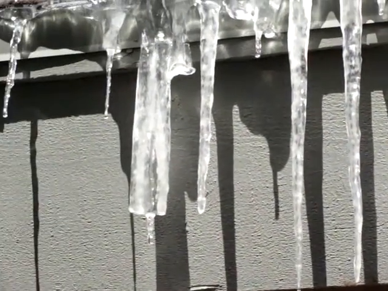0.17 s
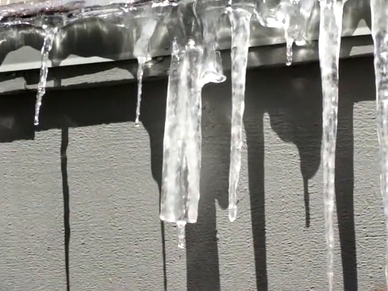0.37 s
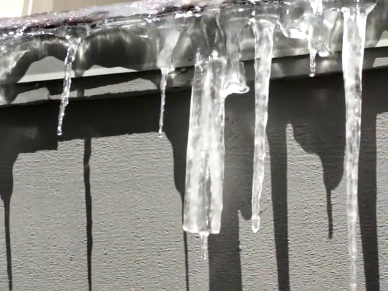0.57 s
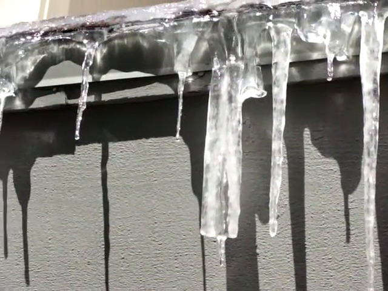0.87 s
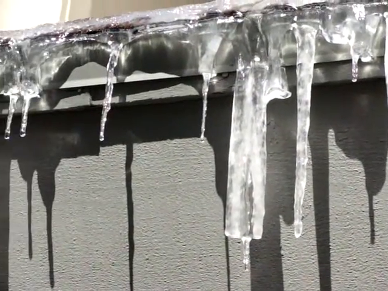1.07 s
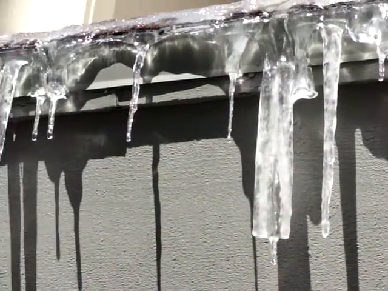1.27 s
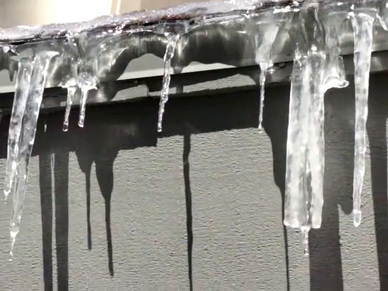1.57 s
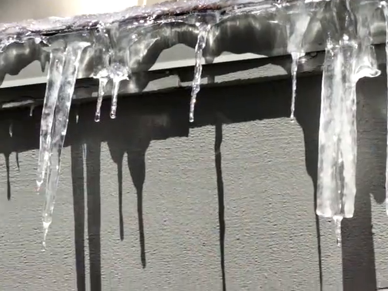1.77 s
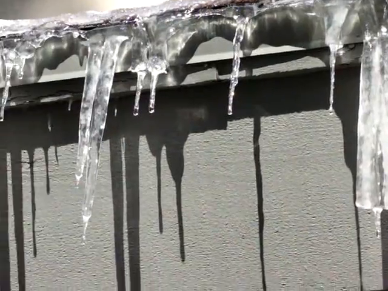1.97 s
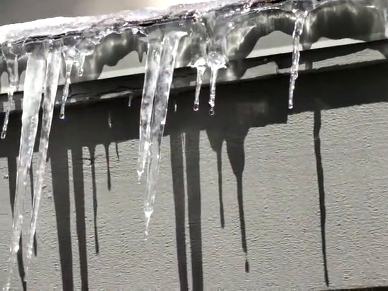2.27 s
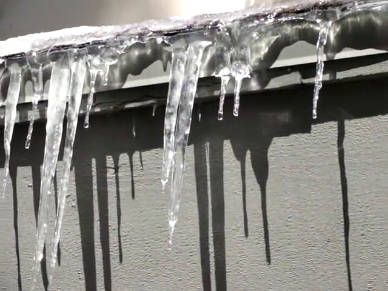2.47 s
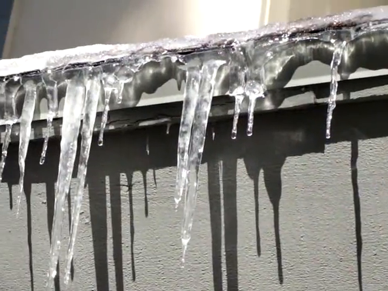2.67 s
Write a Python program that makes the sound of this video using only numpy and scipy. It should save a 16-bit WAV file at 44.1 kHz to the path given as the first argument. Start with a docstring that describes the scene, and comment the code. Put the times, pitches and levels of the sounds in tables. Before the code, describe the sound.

Distant birds chirp over a quiet steady outdoor hum; soft low bumps come in the first second, then irregular icicle drips click and plop nearby, the sharpest just after one second.

```python
"""A steady outdoor hum with small birds chirping and chattering in the distance, from the start;
then low thumps, some perhaps from handling the microphone, and meltwater drips from icicles under an eave
that tick and splash near it. The hum is shaped noise with wavering tones, the birds are gliding sines blurred
by echoes, the thumps are brief low swings, and each drip is a filtered click with a ringing plop and a fading
noise spatter."""
import sys
import numpy as np
from scipy import signal
from scipy.io import wavfile
from scipy.ndimage import uniform_filter1d

SR = 44100
rng = np.random.default_rng(int(sys.argv[2]) if len(sys.argv) > 2 else 0)


def log_audio(samples):
    """Write samples as a 16-bit WAV file to the path given in sys.argv[1]."""
    # one column per channel
    frames = np.atleast_2d(samples).T
    # limit to full scale, then quantise
    limited = np.clip(frames, -1, 1)
    pcm = np.round(limited * 32767).astype(np.int16)
    wavfile.write(sys.argv[1], SR, pcm)


def volts_from_db(level):
    """Convert decibel levels to linear amplitude ratios."""
    exponent = np.asarray(level, float) / 20
    return 10 ** exponent


N = 123921


def evened(x):
    """Scales to rms 1."""
    return x / np.sqrt(np.mean(x ** 2) + 1e-20)


def add(mix, start_s, sound):
    """Adds a sound at a time, or at the beginning if that time is negative."""
    part = mix[max(round(start_s * SR), 0):][:len(sound)]
    part += sound[:len(part)]


def wobble(size, smooth_samples):
    """Low-passed noise of rms 1."""
    pole = np.exp(-1 / smooth_samples)
    return evened(signal.lfilter([1], [1, -pole], rng.standard_normal(size)))


def air():
    """Distant steady wash: shaped noise in faint drifting patches, with a few wavering tones."""
    # Each row: frequency in Hz, relative noise density in dB.
    air_spectrum = [(12, -33), (20, -4.5), (49, -4), (165, -3.5), (294, -1.5), (434, -3), (677, 0.5),
                    (1000, 0), (1300, -5.5), (1560, -3), (1780, -10.5), (1970, -7.5), (2370, -13),
                    (4790, -9.5), (6550, -18.5), (8070, -19), (10200, -24.5), (13300, -54), (22000, -120)]
    # Each row: mean frequency in Hz, rms level in dB before the wavering.
    hum_tones = [(47, -63.5), (120, -70), (7875, -77.5)]
    wash_rms_db, patch_db = -48.5, 1.1
    frames, bin_hz = N // 256 + 5, np.arange(513) * SR / 1024
    real, imag, patches = rng.standard_normal((frames, 513, 3)).T
    patches = uniform_filter1d(patches, size=10, axis=0)  # bins
    patches = evened(uniform_filter1d(patches, size=12, axis=1))  # frames
    hz, db = np.transpose(air_spectrum)
    shape_db = np.interp(np.log(bin_hz + 1), np.log(hz + 1), db)[:, None]
    spectrum = (real + 1j * imag) * volts_from_db(shape_db + patch_db * patches)
    wash = signal.istft(spectrum, nperseg=1024, noverlap=768)[1][:N]
    out = volts_from_db(wash_rms_db) * evened(wash)
    for tone_hz, db in hum_tones:
        turns = np.cumsum(tone_hz + 2.5 * wobble(N, 3000)) / SR
        level = np.sqrt(2) * volts_from_db(db + 1.7 * wobble(N, 4000))
        out += level * np.sin(2 * np.pi * turns)
    return out


def chirp(length_s, from_hz, to_hz):
    """A warbling, fluttering whistle that glides between two pitches."""
    warble, flutter_db = 0.016, 4.5  # rms: fraction of the pitch, level
    u = np.arange(0, 1, 1 / (length_s * SR))
    pitch_wobble = wobble(8192, 60)[:len(u)]
    level_wobble = wobble(8192, 80)[:len(u)]
    hz = (from_hz + (to_hz - from_hz) * u) * (1 + warble * pitch_wobble)
    level = np.sqrt(2) * np.sin(np.pi * u) ** 0.13 * volts_from_db(flutter_db * level_wobble)
    return level * np.sin(2 * np.pi * np.cumsum(hz) / SR)


def chatter(length_s, from_hz, to_hz, spread_hz, peep_s):
    """Many short peeps at scattered pitches, gliding up or down, overlap into a swell."""
    peeps_per_s, glide_spread, level_spread_db = 1200, .12, 3.3  # glide: fraction of the pitch
    out = np.zeros(round((length_s + 3 * peep_s) * SR))
    starts_s = rng.random(800) * 800 / peeps_per_s
    peeps = np.c_[starts_s, rng.standard_normal((800, 4))]
    for s, offset, glide, stretch, loudness in peeps[starts_s < length_s]:
        this_peep_s = peep_s * np.exp(0.306 * np.clip(stretch, -2, 2))
        v = np.arange(0, 1, 1 / (this_peep_s * SR))
        centre_hz = from_hz + (to_hz - from_hz) * s / length_s
        hz = (centre_hz + spread_hz * offset) * (1 + glide_spread * glide * (v - .5))
        swell = np.sin(np.pi * s / length_s) ** .5
        level = swell * volts_from_db(level_spread_db * loudness) * np.sin(np.pi * v)
        add(out, s, level * np.sin(2 * np.pi * np.cumsum(hz) / SR))
    return evened(out)


def birds():
    """Chirps and chatter, blurred by scattered echoes from trees and houses."""
    # Each row: start in seconds, length in seconds, first and last pitch in Hz,
    # nominal level in dB before flutter and echoes.
    single_chirps = [(0, 0.11, 4074, 3680, -60), (0.038, 0.031, 5050, 5590, -53.5),
                     (0.048, 0.052, 5650, 5550, -59.5), (0.144, 0.057, 5610, 4630, -59),
                     (.36, 0.014, 5750, 5970, -57), (0.374, 0.021, 6260, 6220, -51.5),
                     (0.388, 0.027, 4930, 4930, -54.5), (.7, 0.057, 4930, 5060, -54.5),
                     (.703, .02, 4700, 3770, -52), (0.756, 0.023, 3530, 3750, -52),
                     (.78, .015, 5040, 4530, -51), (0.797, 0.053, 5790, 5600, -62),
                     (0.813, .03, 4050, 3460, -51), (0.882, .06, 4110, 3625, -60),
                     (0.995, .04, 4700, 4330, -66), (1.04, 0.021, 5600, 5600, -64),
                     (1.184, 0.017, 3110, 2820, -59.5), (1.201, 0.043, 3950, 4230, -56),
                     (1.297, 0.029, 4620, 3460, -53), (1.747, 0.045, 5020, 3110, -54),
                     (1.763, 0.026, 5600, 5400, -56.5), (1.82, 0.023, 2900, 3030, -61.5),
                     (2.23, .012, 5370, 5360, -49), (1.787, .05, 5200, 4200, -60),
                     (1.908, 0.017, 3620, 3660, -55), (2.055, .01, 3650, 3600, -58),
                     (2.147, 0.04, 4664, 3570, -56), (2.18, 0.018, 3470, 5220, -51.5),
                     (2.37, .022, 3225, 2620, -58), (2.373, 0.025, 3950, 3280, -59),
                     (2.43, .018, 2340, 3570, -59), (2.506, 0.036, 3280, 3680, -56.5),
                     (2.548, 0.023, 3780, 3340, -53), (2.699, .04, 7350, 6200, -61),
                     (2.757, 0.053, 3250, 2250, -60.5)]
    # Bursts of many birds. Each row: start in seconds, length in seconds, first and last centre pitch in Hz,
    # pitch spread in Hz, rms level in dB before echoes.
    bursts = [(0, 0.049, 7370, 6860, 500, -65), (0, 0.31, 4504, 4010, 994, -61),
              (0.679, .2, 4560, 4705, 895, -56), (0.752, .045, 6700, 6880, 380, -63),
              (0.901, .4, 4206, 4000, 795, -65.5), (1.299, 0.17, 4550, 4990, 1004, -59),
              (1.594, .16, 3995, 4200, 798, -62.5), (1.719, 0.1503, 4695, 3803, 888, -54),
              (1.8, 0.451, 5200, 5900, 1100, -56.5), (2.201, 0.2, 5660, 5584, 791, -53.5),
              (2.351, 0.27, 5980, 5780, 1207, -57.5), (2.486, 0.19, 4210, 4640, 798, -55),
              (2.601, .13, 4940, 5165, 389, -51.5), (2.699, 0.089, 4510, 4470, 580, -59)]
    peep_s, wet_db, echo_t60_s = .015, -4.5, 0.34
    direct = np.zeros(N)
    for s, length_s, from_hz, to_hz, db in single_chirps:
        add(direct, s, volts_from_db(db) * chirp(length_s, from_hz, to_hz))
    for s, length_s, from_hz, to_hz, spread_hz, db in bursts:
        add(direct, s - peep_s / 2, volts_from_db(db) * chatter(length_s, from_hz, to_hz, spread_hz, peep_s))
    t = np.arange(SR // 2) / SR
    echoes = rng.standard_normal(len(t)) * volts_from_db(-60 * t / echo_t60_s) * (t > .004)
    echoes /= np.linalg.norm(echoes)
    return direct + volts_from_db(wet_db) * signal.fftconvolve(direct, echoes)[:N]


def thumps():
    """Each thump is one brief low swing out and back; one low tone swells among them."""
    # Each row: centre in seconds, level in dB before the bell-shaped fade, frequency of the swing in Hz.
    swings = [(.21, -45, 60.5), (.24, -49, 70), (0.277, -41.5, 75), (.303, -41.5, 90), (.313, -58, 80),
              (0.361, -43.5, 110), (0.397, -41.5, 70.6), (0.452, -41, 92), (.548, -54, 50.3),
              (.657, -41.5, 55), (0.6838, -33, 124), (0.7005, -34.5, 74.4), (0.745, -41, 90),
              (0.794, -45.5, 70), (0.831, -48, 59.4), (.895, -45.5, 55), (0.931, -47, 90)]
    tone_s, tone_half_s, tone_hz, tone_peak_db = .74, .03, 290, -53
    out, t = np.zeros(N), np.arange(N) / SR
    for s, db, hz in swings:
        cycles = (t - s) * hz
        out -= volts_from_db(db) * np.sin(2 * np.pi * cycles) * np.exp(-(cycles / 0.44) ** 2)
    swell = volts_from_db(tone_peak_db) * np.exp(-((t - tone_s) / tone_half_s) ** 2)
    return out + swell * np.sin(2 * np.pi * tone_hz * t)


def drip(tick_db, plop_hz, low_hz, high_hz, splash_db, t60_s, lead):
    """A sharp tick with a short plop of the struck puddle, the tick's wall echo, and a ragged droplet spatter."""
    plop_db, plop_cycles = -1.5, 1.9  # relative to the tick; decay
    wall_s, wall_db = .0027, -6  # the wall behind the eave
    rise_s, ragged_db = 0.0019, 2.2
    t = (np.arange(8192) - lead) / SR
    band = signal.butter(3, [low_hz, high_hz], "band", fs=SR, output="sos")
    tick = signal.sosfiltfilt(band, 1. * (t == 0))
    tick *= volts_from_db(tick_db) / tick.max()
    width_s = np.where(t < 0, .6, 1) * plop_cycles / plop_hz  # rises faster than it decays
    ring = np.exp(-abs(t / width_s) ** 1.5) * np.cos(2 * np.pi * plop_hz * t)
    plop = volts_from_db(tick_db + plop_db) * ring
    spatter = rng.standard_normal(8192) * volts_from_db(ragged_db * wobble(8192, 60))
    fade = np.clip(t / rise_s, 0, 1) * volts_from_db(splash_db - 60 * t / t60_s)
    out = tick + plop + evened(signal.sosfilt(band, spatter)) * fade
    add(out, wall_s, volts_from_db(wall_db) * tick)
    return out


def drips():
    """Meltwater drops, each placed by the peak of its tick."""
    # Each row: tick time in seconds, tick peak in dB, plop pitch in Hz, low and high band edge in Hz,
    # splash rms in dB before its rise and decay, splash t60 in seconds.
    drops = [(.535, -38, 7200, 6000, 10000, -43, 0.059), (.6134, -28, 3240, 1300, 8200, -38, 0.084),
             (0.801, -46, 5700, 4500, 10000, -49, 0.077), (0.965, -40.5, 9000, 7600, 10200, -56, 0.044),
             (1.1184, -28.5, 5370, 2720, 6400, -36, 0.11), (1.135, -44, 4500, 3500, 5460, -41, .06),
             (1.307, -45, 6350, 5600, 7000, -53, .06), (1.3381, -19, 3200, 1860, 7600, -36, 0.082),
             (1.361, -53, 6800, 6350, 7340, -48, .15), (1.419, -39.5, 5000, 4300, 5630, -46, .05),
             (1.458, -45, 9500, 4000, 10000, -49.5, 0.11), (1.9107, -34, 8400, 6570, 10200, -36.5, 0.031),
             (2.045, -43, 9000, 6500, 9900, -53, 0.05), (2.209, -36.5, 7840, 6660, 9900, -50, 0.031),
             (2.234, -38, 9000, 5000, 10000, -47, 0.068)]
    lead = 64  # samples before the tick peak
    out = np.zeros(N)
    for s, *row in drops:
        add(out, s - lead / SR, drip(*row, lead))
    return out


def scene():
    """All sources reach one microphone, heard alike on both channels."""
    mix = air() + birds() + thumps() + drips()
    return np.array([mix, mix])


def roll_off(x):
    """The treble ends steeply here."""
    return signal.sosfilt(signal.butter(12, 10890, fs=SR, output="sos"), x)


def record(dry):
    """The microphone loses the lowest bass; a steep low-pass removes the top treble."""
    bass_cut = signal.butter(2, 22, "high", fs=SR, output="sos")
    treble_cut = signal.firwin(1023, 10150, width=150, fs=SR)
    heard = signal.sosfilt(bass_cut, dry)
    return roll_off(signal.oaconvolve(heard, treble_cut[None], "same", axes=1))


dry = scene()
out = record(dry)
log_audio(out)
```